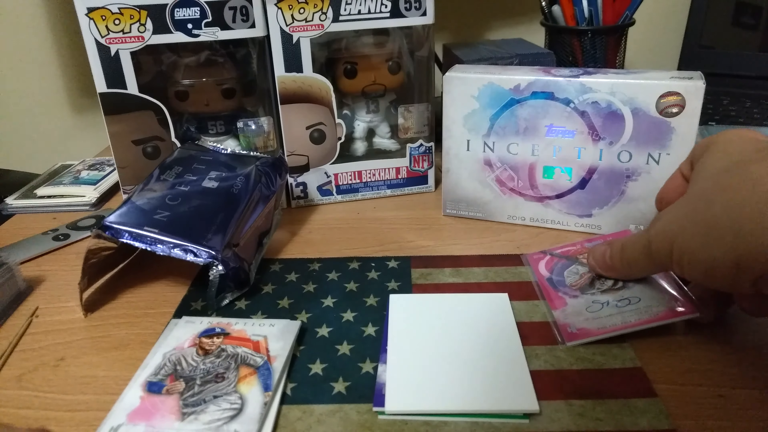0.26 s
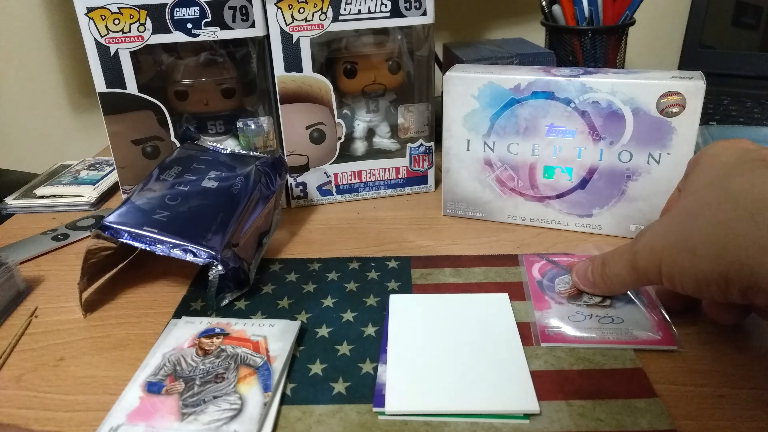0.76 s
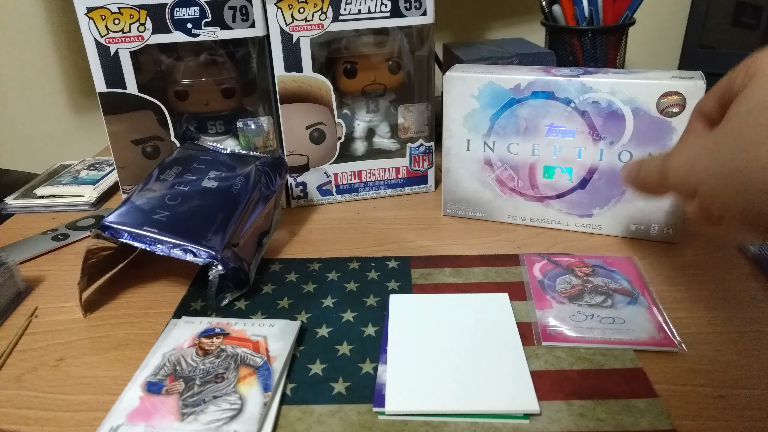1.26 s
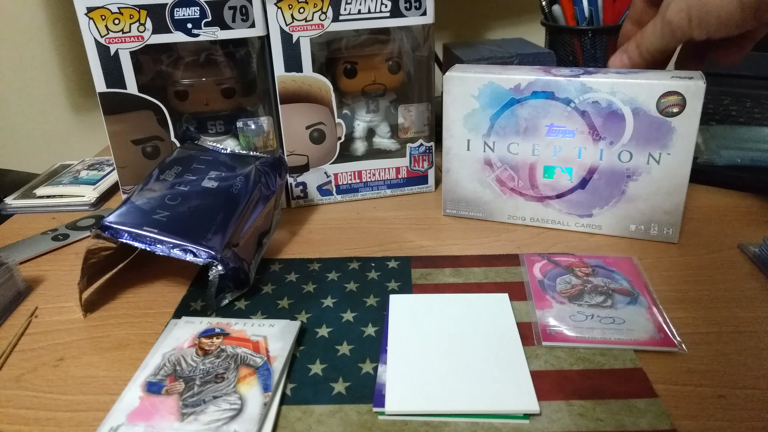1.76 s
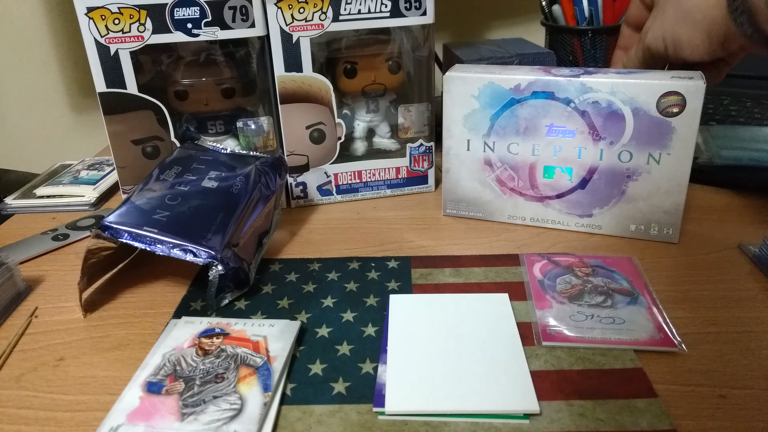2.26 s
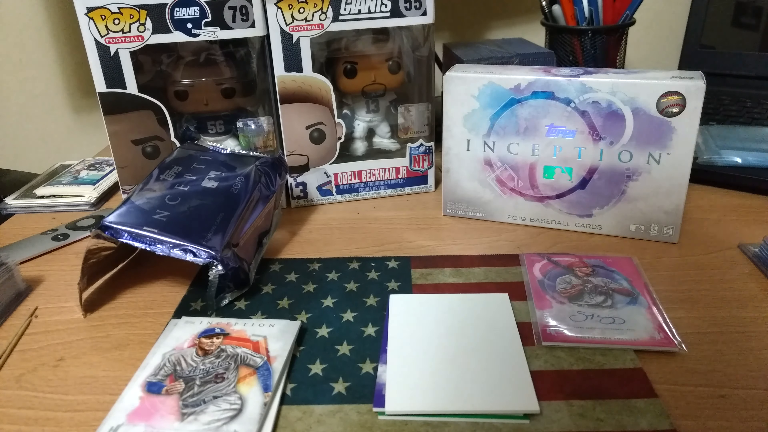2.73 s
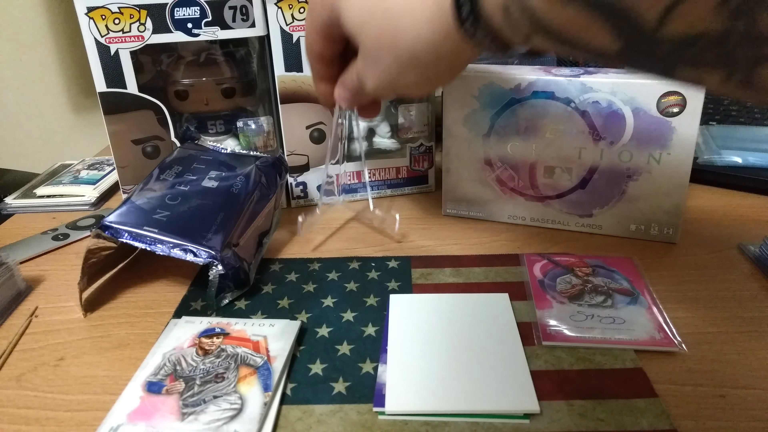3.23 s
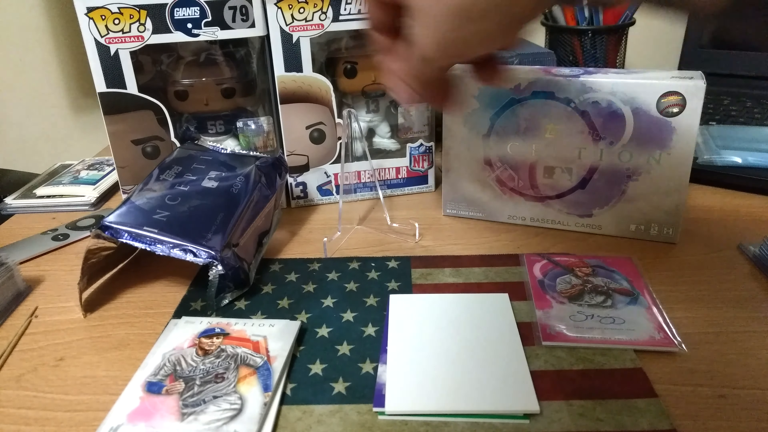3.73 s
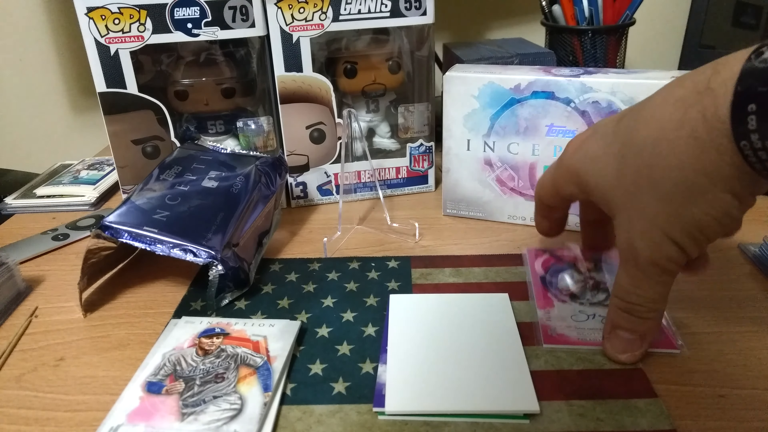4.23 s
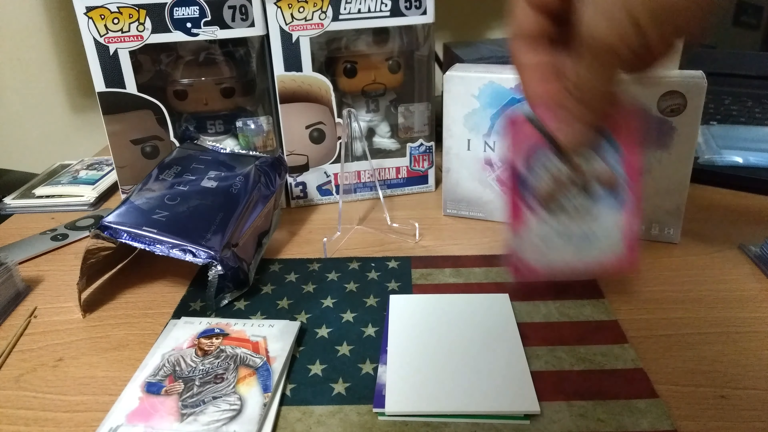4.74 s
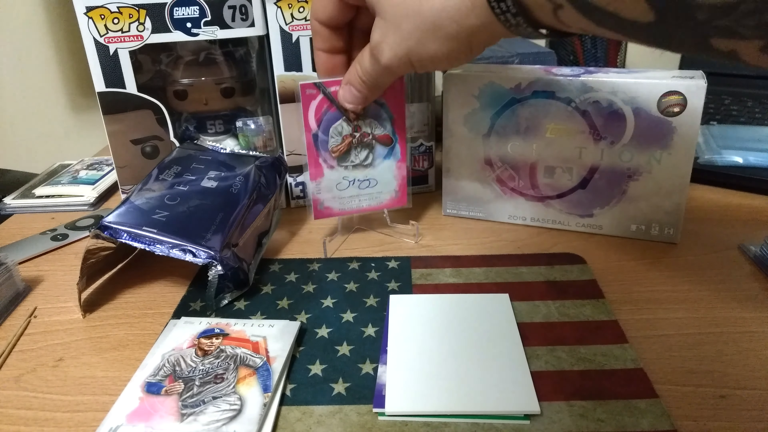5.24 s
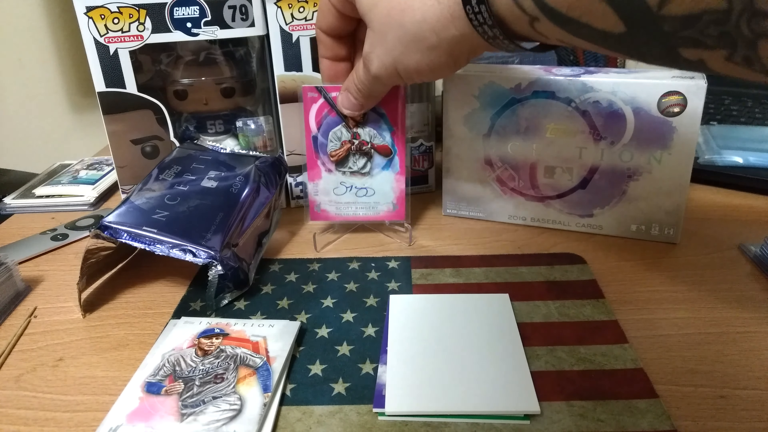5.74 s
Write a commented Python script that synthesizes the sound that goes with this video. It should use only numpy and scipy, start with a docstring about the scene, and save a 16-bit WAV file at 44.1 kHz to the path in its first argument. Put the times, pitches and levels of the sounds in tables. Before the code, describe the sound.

A thin plastic sleeve holding a card rustles and ticks softly on a desk mat. After a pause, a clear plastic stand bumps a hollow cardboard box, squeaks briefly and clicks, then knocks and skids on the wooden desk. The sleeve crinkles sharply as it is picked up, then scrapes and taps into the stand. Close stereo microphones, small quiet room, faint fan hum.

```python
"""Sleeved card and plastic stand

A trading card in a soft plastic sleeve rubs, ticks and squeaks over a desk mat: grains of noise, bursts, whistles.
A small clear stand bumps a cardboard box (coloured noise), clicks, then knocks and skids onto the wooden desk
(decaying sines). The card is picked up, knocks into the stand and scrapes down it.
A small quiet room with a humming fan (shaped noise), heard through a stereo-widened pair of close microphones."""
import sys
import numpy as np
from scipy import signal
from scipy.fft import rfft, irfft, next_fast_len
from scipy.io import wavfile

SR = 44100
rng = np.random.default_rng(int(sys.argv[2]) if len(sys.argv) > 2 else 0)


def transcribe(signal):
    """Save signal, clipped to [-1, 1], as a 16-bit WAV file at the path in sys.argv[1]."""
    frames = np.atleast_2d(signal).T
    limited = np.clip(frames, -1, 1)
    pcm = np.round(limited * 32767).astype(np.int16)
    wavfile.write(sys.argv[1], SR, pcm)


N = 264246
T = np.arange(N) / SR
BLOW_T = T[:SR // 8]   # time axis of one blow
BLOW_SAMPLES = 0.005 * SR   # a unit blow has the energy of this many samples at rms 1
PADDED = next_fast_len(N + 64, True)


def from_db(db):
    """Decibels to gain."""
    return 10 ** (np.asarray(db) / 20)


def rms_one(x):
    """Scale to rms 1."""
    return x / np.sqrt(np.mean(x ** 2) + 1e-20)


def unit_blow(x):
    """Scale a blow to the energy of 5 ms at rms 1."""
    return x * np.sqrt(BLOW_SAMPLES / np.sum(x ** 2))


def at_hz(points, hz):
    """Read a table on a log-frequency axis."""
    f, value = np.transpose(points)
    return np.interp(np.log(hz + 1e-9), np.log(f), value)


def colour(x, spectrum, tilt_db=0):
    """Give a sound a spectrum, tilted by so many dB an octave."""
    size = next_fast_len(len(x), True)
    tilted = [(f, db + tilt_db * np.log2(f)) for f, db in spectrum]
    gain = from_db(at_hz(tilted, np.fft.rfftfreq(size, 1 / SR)))
    return irfft(rfft(x, size) * gain, size)[:len(x)]


def drift(rate):
    """Smooth chance of spread 1 that changes so many times a second."""
    points = rng.standard_normal(N // 8)
    return rms_one(np.interp(T * rate, np.arange(N // 8), points))


def add(track, s, sound):
    """Lay a sound into a track at time s."""
    at = int(s * SR)
    track[at:at + len(sound)] += sound[:N - at]


def panned(x, pan_db):
    """Place a sound between the microphones (L-R dB) at constant power."""
    gain = from_db(np.array([[pan_db], [-pan_db]]) / 2)
    return x * rms_one(gain)


def gesture(start, length, attack, t60, swell_db=0):
    """Envelope of a rub: a short attack, a swell (or fade) up to level 1 at its end, then a release."""
    out = np.zeros(N)
    sounding = (T > start) & (T < start + length + t60)
    t = T[sounding] - start
    held = swell_db * (np.minimum(t / length, 1) - 1)
    released = -60 * np.maximum(t - length, 0) / t60
    out[sounding] = np.minimum(t / attack, 1) * from_db(held + released)
    return out


def grains(per_s, spread_db):
    """Tiny slips at random moments, of very uneven size."""
    sizes = from_db(spread_db * np.minimum(rng.exponential(1, N), 4)) * rng.standard_normal(N)
    return sizes * (rng.random(N) < per_s / SR)


def crack(spectrum, t60, tilt_db=0):
    """A short burst of coloured noise, fading 60 dB in t60 seconds."""
    noise = colour(rng.standard_normal(len(BLOW_T)), spectrum, tilt_db)
    return unit_blow(noise * from_db(-60 * BLOW_T / t60))


def ring(modes, tilt_db=0, free=1, vary_db=6.0):
    """A struck body: decaying sines, their strengths new for each blow; a grip shortens them."""
    hz, db, t60 = np.transpose(modes)[:, :, None]
    gain = from_db(db + tilt_db * np.log2(hz) + vary_db * rng.standard_normal(hz.shape))
    gain[1::2] *= -1   # neighbouring modes have opposite signs
    fall = from_db(-60 * BLOW_T / (t60 * max(free, 0.1)))
    return unit_blow(np.sum(gain * np.sin(2 * np.pi * hz * BLOW_T) * fall, axis=0))


# Room air, broad colour: pitch_hz, density_db (relative, per Hz)
AIR_SPECTRUM = [(20, 14), (40, -10), (57, 2), (85, 2), (130, 8.5), (170, 0.5), (210, 4.5), (270, 5),
                (360, -2), (900, -7.5), (1500, -14.5), (3000, -19), (8000, -28), (12000, -30.5),
                (16000, -24.5)]
# How alike the air is in both channels: pitch_hz, likeness (-1 to 1)
AIR_LIKENESS = [(60, -1), (130, -0.085), (290, 0.57), (640, 0.22), (1400, -0.13), (3000, -0.03),
                (15000, -0.079)]
# Stereo lean of the air: pitch_hz, left_minus_right_db
AIR_PAN = [(30, 3), (60, 21), (120, 1), (220, 5), (700, 1.5), (2000, 2), (8000, 0), (15000, -5.5)]
# Fan hum resonances: pitch_hz, width_hz, level_db
FAN_HUM = [(207.3, 22, -63), (256.7, 2.4, -68.5)]


def room_air(air_db=-54.5, fan_pan_db=2.0):
    """Soft steady rumble and hiss, with a fan humming in two narrow resonances."""
    hz = np.fft.rfftfreq(PADDED, 1 / SR)
    mid, side, blades = rfft(rng.standard_normal((3, PADDED)))
    alike = np.clip(at_hz(AIR_LIKENESS, hz), -1, 1)
    sides = np.array([[1], [-1]])
    stereo = np.sqrt(1 + alike) * mid + sides * np.sqrt(1 - alike) * side
    air = stereo * from_db(at_hz(AIR_SPECTRUM, hz) + sides * at_hz(AIR_PAN, hz) / 2)
    fan = np.zeros(N)
    for pitch_hz, width_hz, db in FAN_HUM:
        resonance = blades / (1 + (2 * (hz - pitch_hz) / width_hz) ** 2)
        fan += from_db(db) * rms_one(irfft(resonance, PADDED)[:N])
    return from_db(air_db) * rms_one(irfft(air, PADDED)[:, :N]) + panned(fan, fan_pan_db)


def crinkle(per_s=500, spread_db=5.0, count=10):
    """Small creases of the film snap, each ringing for a few cycles at one of several pitches."""
    out = np.zeros(N)
    for hz in np.geomspace(4500, 15000, count):
        b, a = signal.iirpeak(hz, 5, fs=SR)
        out += signal.lfilter(b, a, grains(per_s / count, spread_db) + 1e-18)   # offset keeps the filter awake
    return rms_one(out)


# Fingers rub and push the plastic: start_s, length_s, film_hiss_db, card_rub_db (relative levels)
STROKES = [(0.159, 0.12, -54, -60.5), (0.357, 0.096, -64, -64), (0.512, 0.12, -56, -55),
           (0.832, 0.017, -58.5, -54.5), (0.902, 0.023, -53.5, -54.5), (1.465, 0.28, -71, -61.5),
           (3.273, 0.18, -61.5, -78), (3.465, 0.14, -69.5, -72), (4.076, 0.023, -57.5, -59.5),
           (4.141, 0.018, -66, -61), (4.209, 0.045, -70, -63.5), (4.35, 0.08, -45, -47.5),
           (4.444, 0.066, -47.5, -60), (4.512, 0.11, -60, -74), (4.632, 0.055, -52.5, -56.5),
           (4.987, 0.058, -62, -64)]
# The sleeve ticks and buckles: start_s, level_db (relative), tilt_db_per_octave
TICKS = [(0.127, -44.5, 14), (0.168, -51.5, -5.5), (0.27, -48, 3), (0.293, -47.5, 1.5), (0.933, -37, 1),
         (1.194, -49.5, -4.5), (4.078, -52, 4), (4.335, -56, 2), (4.369, -37.5, 0.5), (4.3893, -48, -10.5),
         (4.431, -36.5, -2.5), (4.7091, -36.5, 4.5), (5.482, -55.5, 1), (5.789, -58.5, -4.5),
         (5.84, -42.5, -4), (5.863, -36, -1)]
# Colours of film hiss, card rub and tick: pitch_hz, density_db (relative, per Hz)
FILM_SPECTRUM = [(1000, -43), (4000, -10), (7000, -5), (10000, 3.5), (12500, 3), (15500, 1)]
RUB_SPECTRUM = [(200, 8), (700, 2.5), (1200, 4), (2000, 0), (2800, 2), (4000, -1), (6000, 2), (9000, -15),
                (15000, -31)]
TICK_SPECTRUM = [(300, -52), (1000, -4.5), (2000, -6), (4000, -1.5), (6000, -2), (8000, 0), (11000, -1),
                 (15500, 8)]
# a push speeds up to its end, then dies away
STROKE_ATTACK_S, STROKE_SWELL_DB, STROKE_T60_S = 0.017, 10, 0.15


def sleeve():
    """The film hisses and crinkles, the card rubs more dully, and the sleeve ticks as it buckles."""
    film_level, rub_level = np.zeros((2, N))
    for s, length, film_db, rub_db in STROKES:
        push = gesture(s, length, STROKE_ATTACK_S, STROKE_T60_S, STROKE_SWELL_DB)
        film_level += from_db(film_db) * push
        rub_level += from_db(rub_db) * push
    catch = from_db(2.2 * drift(120))   # friction grips and lets go
    hiss = rms_one(colour(grains(per_s=8600, spread_db=1.0), FILM_SPECTRUM))
    film = film_level * (from_db(2.5) * hiss + from_db(-10) * crinkle())
    rub = rub_level * rms_one(colour(grains(per_s=8200, spread_db=3.5), RUB_SPECTRUM))
    out = catch * (from_db(-4.0) * film + from_db(-6.0) * rub)
    for s, db, tilt_db in TICKS:
        add(out, s, from_db(db) * crack(TICK_SPECTRUM, t60=0.012, tilt_db=tilt_db))
    return panned(out, pan_db=-49), from_db(-13.5) * out


# Plastic squeaks as the sleeve comes to rest and as the stand is gripped:
# start_s, length_s, start_pitch_hz, level_db (relative)
SQUEAKS = [(0.926, .007, 5750, -52.5), (2.265, .014, 6030, -52), (2.288, 0.0067, 5670, -52.5),
           (2.307, 0.0068, 5900, -66)]
SQUEAK_SAG_HZ_PER_S, SQUEAK_ATTACK_S, SQUEAK_T60_S = 11000, 0.0041, 0.028


def squeak():
    """Fast stick-slip on smooth plastic: a rough, sagging whistle with its octave and a little hiss."""
    hz, level = np.zeros((2, N))
    for s, length, pitch_hz, db in SQUEAKS:
        sagging_hz = pitch_hz - SQUEAK_SAG_HZ_PER_S * np.minimum(T - s, 2 * length)
        hz = np.where(T < s, hz, sagging_hz)
        level += from_db(db) * gesture(s, length, SQUEAK_ATTACK_S, SQUEAK_T60_S)
    phase = 2 * np.pi * np.cumsum(hz * (1 + 0.0157 * drift(1400))) / SR
    whistle = from_db(2.0 * drift(250)) * np.sin(phase)
    octave = from_db(-4 + 4.5 * drift(200)) * np.sin(2 * phase)
    hiss = from_db(-13) * rng.standard_normal(N)
    out = level * (whistle + octave + hiss)
    return panned(out, pan_db=-19), from_db(-4) * out


BOUNCE_S, BOUNCE_LOSS_DB = 0.0087, 0.5   # the loss comes on top of the grip's


def with_rebound(s, looseness):
    """A blow rebounds once, the more weakly the tighter the grip: (s, gain)."""
    return (s, 1), (s + BOUNCE_S, looseness * from_db(-BOUNCE_LOSS_DB))


# The stand catches on the box, mostly duller as it presses in:
# start_s, thud_db (relative), thud_tilt_db_per_octave, snap_db (relative)
BUMPS = [(1.958, -36, 4, -39), (1.978, -35, -1, -41), (1.993, -36.5, -0.5, -48), (2.009, -34, -4, -50.5),
         (2.101, -48.5, 1.5, -65)]
# Colour of the cardboard thud: pitch_hz, density_db (relative, per Hz)
BOX_SPECTRUM = [(200, -28), (300, -6), (400, 12.5), (520, -10), (670, 13), (820, -16), (1050, 6),
                (1200, 1.5), (1340, -1), (1470, 1.5), (1600, -6.5), (1900, -12.5), (3300, -16.5),
                (6000, -39)]
# Colour of hard plastic contact, here and in the clicks and knocks: pitch_hz, density_db (relative, per Hz)
SNAP_SPECTRUM = [(300, 8.5), (900, -36), (2500, 1.5), (4000, 7), (6000, -1), (8000, -0.5), (11000, -1.5),
                 (15000, 3)]
BOX_LOOSENESS = 0.49   # of the grip while the stand is lifted past the box, 0-1


def box_bumps():
    """The stand catches on the hollow box in a run of bumps; cardboard answers with a rough, short thud."""
    thuds, snaps = np.zeros((2, N))
    for start, box_db, tilt_db, snap_db in BUMPS:
        for s, gain in with_rebound(start, BOX_LOOSENESS):
            pressure = unit_blow(rng.standard_normal(len(BLOW_T)) * from_db(-60 * BLOW_T / 0.054))
            thud = unit_blow(colour(pressure, BOX_SPECTRUM, tilt_db)[:len(BLOW_T) // 2])
            add(thuds, s, gain * from_db(box_db) * thud)
            add(snaps, s, gain * from_db(snap_db) * crack(SNAP_SPECTRUM, t60=0.037))
    direct = panned(from_db(-2) * thuds, pan_db=-6.5) + panned(snaps, pan_db=-32)
    return direct, from_db(-5) * thuds + snaps


# Desk top modes: pitch_hz, level_db (relative, varies per blow), t60_s
DESK_MODES = [(247, -6.5, 0.067), (428, -12.5, 0.046), (671, -1.5, 0.05), (759, -7, 0.069),
              (857, 3.5, 0.037), (1090, 16, 0.0024), (1400, 6, 0.018), (1433, -3.5, 0.038),
              (1700, -2.5, 0.03), (2165, 1.5, 0.063)]


def desk_thud(contact_hz=1950, bass_hz=280):
    """The foot stays on the wood for a moment, which rounds off the top; the board radiates little bass."""
    soft = signal.butter(4, contact_hz, fs=SR, output="sos")
    thin = signal.butter(2, bass_hz, "high", fs=SR, output="sos")
    return unit_blow(signal.sosfilt(np.vstack([soft, thin]), ring(DESK_MODES)))


# Clicks as the stand is lifted and rings freely: start_s, level_db (of the snap; relative)
CLICKS = [(2.3595, -33.5), (2.3755, -42)]
# Empty stand modes, also for its knocks and skid: pitch_hz, level_db (relative, varies per blow), free_t60_s
STAND_MODES = [(1755, -11.5, 0.089), (2000, -15, 0.0087), (2320, -5, 0.056), (3330, -9, 0.044),
               (3950, -1.5, 0.032), (4830, 4.5, 0.023), (5128, -3.5, 0.084), (5200, 0.5, 0.018),
               (5100, -20, 0.39), (8900, -34, 0.043), (13100, -39, .03)]


def stand_clicks():
    """A hard, bright snap that leaves the stand ringing and barely shakes the desk."""
    body, snaps = np.zeros((2, N))
    for s, db in CLICKS:
        add(body, s, from_db(db - 8.5) * desk_thud() + from_db(db - 6.5) * ring(STAND_MODES, tilt_db=30))
        add(snaps, s, from_db(db) * crack(SNAP_SPECTRUM, t60=0.025))
    return panned(body, pan_db=-6) + panned(snaps, pan_db=-28), from_db(-4.5) * (body + snaps)


SNAP_BELOW_RING_DB = 8   # a knock's contact snap follows its ring


def knocks(blows, modes, tilt_db):
    """Knocks thud in the desk, ring the stand and snap at the hard contact; a tight grip cuts the ring short."""
    body, snaps = np.zeros((2, N))
    for start, desk_db, ring_db, looseness in blows:
        for s, gain in with_rebound(start, looseness):
            thud = from_db(desk_db) * desk_thud()
            ringing = from_db(ring_db) * ring(modes, tilt_db, looseness)
            snap = from_db(ring_db - SNAP_BELOW_RING_DB) * crack(SNAP_SPECTRUM, t60=0.06, tilt_db=-3)
            add(body, s, gain * (thud + ringing))
            add(snaps, s, gain * snap)
    return panned(body, pan_db=-6.0) + panned(snaps, pan_db=-25), body + snaps


# The stand's feet knock on the desk: start_s, desk_thud_db, stand_ring_db (relative levels), looseness (0-1)
STAND_KNOCKS = [(3.3724, -29, -38, 0.23), (3.3954, -36.5, -38, 0.37), (3.4405, -33.5, -64, 0.27),
                (3.4475, -26, -54, 0.04), (3.559, -41.5, -70, 1), (3.5932, -31, -51.5, 0.51)]


def stand_knocks():
    """The empty stand is set down, foot after foot, damped by the fingers."""
    direct, sound = knocks(STAND_KNOCKS, STAND_MODES, tilt_db=0.5)
    return direct, from_db(-7.5) * sound


SKID_S, SKID_LENGTH_S, SKID_DB = 3.401, 0.029, -42.5   # the feet skid between two knocks


def stand_skid():
    """The feet chatter over the wood, shaking both desk and stand."""
    level = from_db(SKID_DB) * gesture(SKID_S, SKID_LENGTH_S, attack=0.003, t60=0.065)
    slips = rms_one(grains(per_s=1600, spread_db=-5)) * level
    desk = from_db(0.5) * desk_thud(contact_hz=1490)
    stand = from_db(-7) * ring(STAND_MODES, tilt_db=-8, free=0.6)
    out = signal.fftconvolve(slips, desk + stand)[:N] / np.sqrt(BLOW_SAMPLES)
    return panned(out, pan_db=1), from_db(-4) * out


# The card's edge knocks as it is picked up, then drops into the stand:
# start_s, desk_thud_db, card_and_stand_ring_db (relative levels), looseness (0-1)
CARD_KNOCKS = [(4.433, -49, -54, 0.2), (5.484, -41, -67, 0.37), (5.6487, -33.5, -60, 0.14),
               (5.6669, -33, -38.5, 0), (5.675, -30.5, -49, 0.48), (5.6995, -38, -73, 0.54)]
# Modes of the stand with the card leaning on it, also for the scrape:
# pitch_hz, level_db (relative, varies per blow), free_t60_s
LOADED_STAND_MODES = [(1490, -22, .04), (1924, -2, 0.052), (2720, -7, 0.017), (3180, -2.5, 0.04),
                      (3970, -22, 0.035), (4770, -24, .04)]


def card_knocks():
    """The card taps the desk on its way up, then lands in the stand and rocks it."""
    direct, sound = knocks(CARD_KNOCKS, LOADED_STAND_MODES, tilt_db=-16)
    return direct, from_db(-8) * sound


SCRAPE_S, SCRAPE_LENGTH_S, SCRAPE_DB = 5.542, 0.063, -47   # the card's edge runs down the stand
SCRAPE_FADE_DB = 9.5   # it slows on the way
SCRAPE_RING_DB, SCRAPE_RING_RISE_S = 3, 0.018   # the stand's ring builds up under the edge


def edge_scrape():
    """The card's edge sticks and slips down the stand, shaking both it and the desk."""
    fading = gesture(SCRAPE_S, SCRAPE_LENGTH_S, attack=0.002, t60=0.028, swell_db=-SCRAPE_FADE_DB)
    level = from_db(SCRAPE_DB - SCRAPE_FADE_DB) * fading
    ringing = from_db(SCRAPE_RING_DB) * np.clip((T - SCRAPE_S) / SCRAPE_RING_RISE_S, 0, 1)
    slips = rms_one(grains(per_s=1900, spread_db=2.5)) * level
    desk = signal.fftconvolve(slips * from_db(1.5), desk_thud(contact_hz=1450))
    stand = signal.fftconvolve(slips * ringing, ring(LOADED_STAND_MODES))
    out = (desk + stand)[:N] / np.sqrt(BLOW_SAMPLES) + from_db(-21.0) * slips
    return panned(out, pan_db=-7), from_db(-14) * out


# Decay of the room tail: pitch_hz, t60_s
ROOM_T60 = [(200, 0.26), (1000, 0.17), (4000, 0.23), (15000, 0.12)]


def room(x, clutter_db=7.0, clutter_t60=0.022):
    """Quick scatter from the things on the desk, then the tail of the room, dying band by band."""
    t = T[:SR // 2]
    edges = np.geomspace(100, 18000, 9)
    response = np.zeros((2, len(t)))
    for low, high in zip(edges, edges[1:]):
        band_pass = signal.butter(2, [low, high], "band", fs=SR, output="sos")
        band = signal.sosfilt(band_pass, rng.standard_normal((2, len(t))))
        tail = from_db(-60 * t / at_hz(ROOM_T60, np.sqrt(low * high)))
        clutter = from_db(clutter_db - 60 * t / clutter_t60)
        response += band * (tail + clutter)
    response *= np.clip(t / 0.002 - 1, 0, 1)   # silent for 2 ms, full by 4 ms
    return signal.fftconvolve(x[None], rms_one(response) / np.sqrt(len(t)))[:, :N]


def scene():
    """Every source is heard directly and through the room, over the room's air."""
    sources = [sleeve(), squeak(), box_bumps(), stand_clicks(),
               stand_knocks(), stand_skid(), card_knocks(), edge_scrape()]
    direct, sent = zip(*sources)
    return sum(direct) + panned(room(sum(sent)), pan_db=-1) + room_air()


# Stereo widener, share taken from the opposite channel: pitch_hz, gain
CROSSFEED = [(200, 0.12), (900, 0.7), (2200, 0.92), (4400, 0.59), (7000, 0.44), (15000, 0.38)]
CROSSFEED_LAG_S, CUTOFF_HZ = 20 / 44100, 16000
LEFT_OFFSET = 0.0075   # of full scale


def record(dry):
    """The widener subtracts a delayed copy of the other channel; the top is cut; the left sits off zero."""
    hz = np.fft.rfftfreq(PADDED, 1 / SR)
    both = rfft(dry, PADDED)
    feed = np.clip(at_hz(CROSSFEED, hz), 0, 1) * np.exp(-2j * np.pi * hz * CROSSFEED_LAG_S)
    wide = irfft(both - feed * both[::-1], PADDED)[:, :N]
    top_cut = signal.ellip(10, 0.1, 70, CUTOFF_HZ, fs=SR, output="sos")
    return signal.sosfilt(top_cut, wide) + [[LEFT_OFFSET], [0]]


dry = scene()
out = record(dry)
transcribe(out)
```